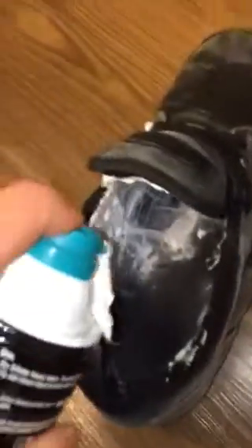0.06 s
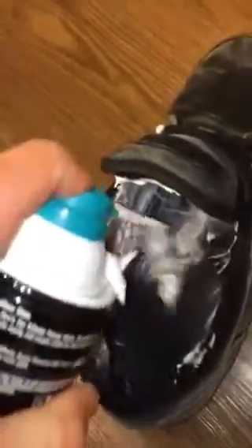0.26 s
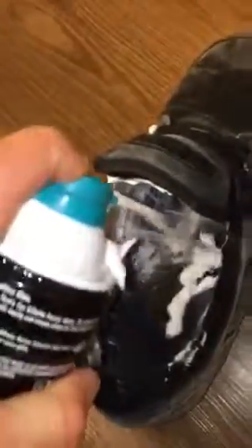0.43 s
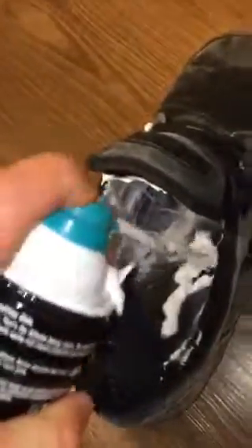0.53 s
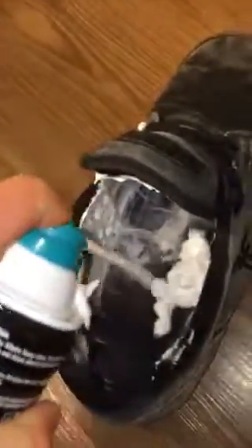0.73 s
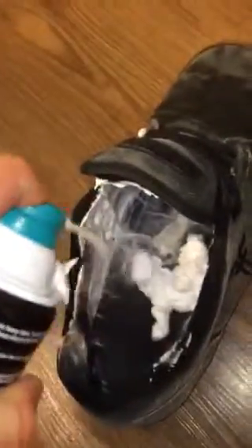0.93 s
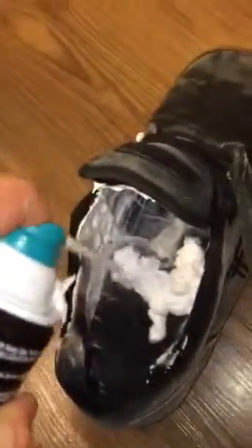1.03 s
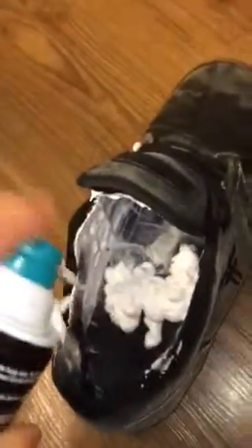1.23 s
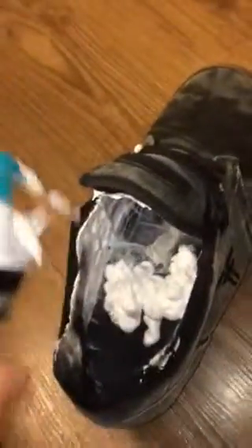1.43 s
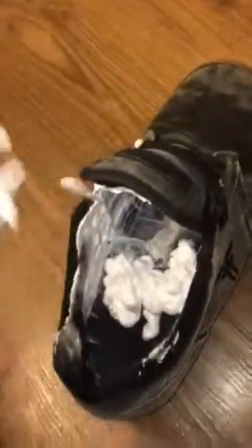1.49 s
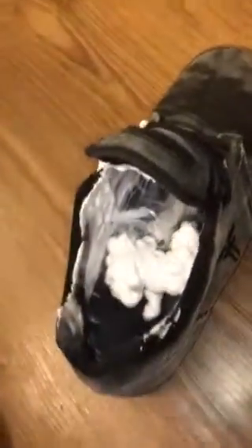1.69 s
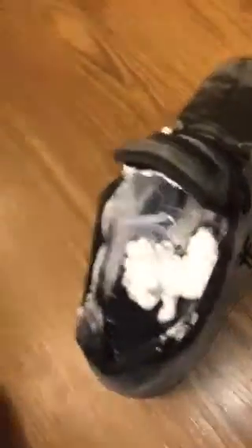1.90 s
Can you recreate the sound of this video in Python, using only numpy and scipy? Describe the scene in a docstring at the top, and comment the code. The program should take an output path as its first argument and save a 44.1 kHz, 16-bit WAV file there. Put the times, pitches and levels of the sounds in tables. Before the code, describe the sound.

An aerosol can sprays foam close to the microphone. From about 0.2 seconds the nozzle spits quick wet bursts, loudest near 0.3, then settles into a sputtering hiss with tiny pops that slowly swells. A thin, airy whistle joins around 1.1 seconds, and the spray cuts off at 1.3 with a brief fizz. One faint tick follows at 1.7. An appliance hums low in the quiet room throughout.

```python
"""Foam spray on a shoe

Close to the microphone, in a quiet room with an appliance humming, an aerosol can sprays foam.
The nozzle spits a quick run of wet bursts, then settles into a sputtering jet that slowly swells.
Gas pockets pop in the stream, and the nozzle sings just before the valve shuts.
The foam fizzes for a moment, the room rings briefly, and one faint tick follows."""
import sys
import numpy as np
from scipy import signal
from scipy.fft import rfft, irfft
from scipy.io import wavfile

SR = 44100
rng = np.random.default_rng(int(sys.argv[2]) if len(sys.argv) > 2 else 0)


def wav_out(sig):
    """Save sig, one row per channel (or a flat mono array), as 16-bit PCM at SR to the path in sys.argv[1]."""
    wavfile.write(sys.argv[1], SR, np.round(np.clip(np.atleast_2d(sig).T, -1, 1) * 32767).astype(np.int16))


N = 85995
T = np.arange(N) / SR

# appliance hum (frequency [Hz], level [dB])
HUM_TONES = [(74, -60), (102.3, -60.5), (121, -59.5), (150.7, -60.5), (183, -56), (296, -72), (393, -70.5),
             (468, -71.5), (899, -78), (952.8, -76.5)]
# rumble of the room (frequency [Hz], relative level [dB])
RUMBLE_COLOUR = [(20, -26), (45, -14), (70, -1), (125, -2.5), (190, -6.5), (230, -9.5), (330, -16.5),
                 (560, -16.5), (720, -25.5), (950, -28), (1200, -27), (2000, -32.5), (2700, -35.5),
                 (5000, -43.5), (9000, -47.5), (15500, -52)]
# the room's reverberation (frequency [Hz], time to fall 60 dB [s])
REVERB_TIMES = [(300, 0.02), (1300, 0.43), (3000, .34), (4400, .38), (6500, 0.34), (12000, 0.2)]
# its diffuse tail (frequency [Hz], gain [dB])
REVERB_COLOUR = [(300, -18.5), (1500, -10), (3000, -13.5), (4500, -9), (7000, -15.5), (14000, -13)]
# spectra of the tick, settling foam, gas hiss and spits (frequency [Hz], relative level [dB])
TICK_COLOUR = [(200, -4), (700, -2), (1300, -5), (2200, -1), (4000, -14), (8000, -21), (10000, -27),
               (15000, -26)]
FIZZ_COLOUR = [(500, -19), (1500, -5), (2800, -4.5), (3900, -5), (4700, 2), (5600, -5), (7000, -19),
               (10000, -28), (15000, -34)]
GAS_COLOUR = [(3000, -12), (9000, -5), (10400, 2), (11200, -1), (14700, -2.5), (15600, 0.5)]
SPIT_COLOUR = [(200, -19.5), (580, -27), (850, -2.5), (1250, -8.5), (2000, 3.5), (2450, -4), (2800, 3.5),
               (3500, -9.5), (3950, 0.5), (4800, -10.5), (5350, -6), (5800, -11), (6400, -9), (7500, -18),
               (10000, -22.5), (11800, -18.5), (13000, -28.5), (15500, -30)]
# flow through the nozzle (time [s], level [dB])
FLOW_LEVELS = [(.162, -50), (.168, -49.5), (.2, -44), (.24, -34), (.26, -33.5), (.288, -30), (.305, -38),
               (.335, -42.5), (.42, -41), (.6, -39), (.85, -35), (1.0, -36), (1.06, -34.5), (1.2, -34.5),
               (1.275, -35.5), (1.289, -40.5), (1.296, -79)]
# resonances of the singing nozzle (frequency [Hz], width [Hz], level at the peak [dB])
NOZZLE_MODES = [(3620, 200, -40), (4474, 180, -38.5), (5360, 350, -44)]
# narrow dips in the spray's spectrum (frequency [Hz], width [Hz])
SPRAY_NOTCHES = [(4920, 306), (10400, 680)]
# large gas pockets popping (time [s], relative level [dB], pitch [Hz])
LARGE_POPS = [(.1932, -28, 8070), (0.2027, -27, 5300), (.2155, -24.5, 6500), (0.2636, -18.5, 2840),
              (.2788, -19, 5260), (.4307, -32.5, 6500), (.4477, -32, 5370), (.458, -21.5, 4180),
              (0.457, -29, 6550), (0.495, -29, 4130), (0.4952, -32.5, 6720), (.5534, -29, 6800),
              (.5543, -34.5, 8300), (0.598, -30, 4070), (.603, -26.5, 4250), (.6115, -30, 5400),
              (.6316, -27, 3400), (.7122, -28, 5510), (.7202, -30.5, 7700), (0.727, -25.5, 4270),
              (.7406, -28.5, 4000), (0.7517, -28.5, 6460), (.824, -26, 6500), (.8509, -23.5, 5860),
              (0.8561, -20, 3600), (.8799, -30, 7700), (0.9148, -27, 6240), (.9227, -23, 6500),
              (.9227, -28, 9070), (0.9366, -25, 3500), (0.985, -25, 4700), (.9993, -29, 8000),
              (1.0922, -29.5, 7580), (1.12, -25, 4280), (1.1348, -22, 5600), (1.1586, -30, 5460),
              (1.196, -25.5, 3500), (1.2286, -35, 8440), (1.2618, -24, 3620), (1.2718, -21.5, 3700)]
# spits as the nozzle clears (time [s], relative level [dB], treble against the whole [dB])
SPIT_EVENTS = [(0.172, -34.5, -16), (0.1741, -36, -21), (0.1879, -33, -9.0), (0.1978, -30, -16),
               (0.2, -27.5, -17), (0.209, -24, -8.5), (0.2144, -29, 2), (0.2225, -25.5, -2.5),
               (0.2308, -25, -7), (0.2403, -22.5, -9), (0.25, -24, -16), (0.2532, -18.5, -18),
               (0.2587, -23, -16), (0.2634, -17.5, -24.0), (0.2685, -34, -15), (0.2749, -21.0, -12.5),
               (0.2779, -25.5, -15), (0.2861, -16.5, -19), (0.288, -20, -18), (0.2934, -20.5, -7),
               (0.3041, -30.5, 3), (0.3251, -28.5, -25)]
# jet spectrum, early then late (frequency [Hz], relative level [dB], frequency [Hz], relative level [dB])
JET_COLOURS = [(100, -22, 100, -21), (420, -11, 410, -11), (544, -14, 570, -17), (690, -2, 720, -6),
               (900, 1, 1000, 2), (1300, 0, 1380, 2.5), (1655, -2.5, 1680, -1.5), (2030, 3, 2180, 4),
               (2380, -4.5, 2580, -9), (2720, 2, 3090, -0.5), (3160, -3, 3330, -5), (3480, -8, 3620, 0.5),
               (3750, -3.5, 4050, -8), (4120, -1, 4460, -1.5), (4920, -7, 5100, -7),
               (5360, -3.5, 5500, -3.5), (6000, -13.5, 6050, -13), (6700, -10, 6900, -11.5),
               (7400, -19.5, 7100, -14.5), (8400, -18.5, 8700, -15.5), (10100, -27, 10400, -22),
               (15600, -28, 14000, -30)]


def amp(db):
    """Decibels to gain."""
    return 10 ** (np.asarray(db) / 20)


def unit(x):
    """Scales to rms 1."""
    return x / np.sqrt(np.mean(abs(x) ** 2) + 1e-20)


def read(points, hz):
    """Reads a curve on a log-frequency axis."""
    f, value = np.transpose(points)
    return np.interp(np.log(hz + 1), np.log(f + 1), value)


def add(mix, start_s, sound):
    """Mixes a sound in at a time."""
    part = mix[round(start_s * SR):][:len(sound)]
    part += sound[:len(part)]


def colour(x, points, size=8192):
    """Applies a causal filter of unit energy with the given spectrum."""
    log_gain = np.log(amp(read(points, abs(np.fft.fftfreq(size, 1 / SR)))))
    taps = np.fft.ifft(np.exp(np.conj(signal.hilbert(log_gain)))).real[:size // 2]
    return signal.fftconvolve(x, taps / np.linalg.norm(taps))[:N]


def resonate(x, hz, width_hz):
    """Passes a sound through one resonance."""
    return signal.lfilter(*signal.iirpeak(hz, hz / width_hz, fs=SR), x)


def drift(rate_hz):
    """Random wandering of rms 1, mostly slower than the rate."""
    hz = np.fft.rfftfreq(N, 1 / SR)
    return unit(irfft(rfft(rng.standard_normal(N)) * np.exp(-(hz / rate_hz) ** 2), N))


def room_tone(waver=0.72, waver_hz=8.3, rumble_db=-52.5):
    """An appliance hums unsteadily over a low rumble."""
    hum = np.zeros(N)
    for hz, db in HUM_TONES:
        wander = 1 + waver * (drift(waver_hz) + 1j * drift(waver_hz))
        tone = np.exp(2j * np.pi * (hz * T + rng.random()))
        hum += amp(db) * unit((wander * tone).real)
    gain = amp(read(RUMBLE_COLOUR, np.fft.rfftfreq(N, 1 / SR)))
    rumble = irfft(rfft(rng.standard_normal(N)) * gain, N)
    return hum + amp(rumble_db) * unit(rumble)


def room(x, reflections=8, near_db=-11, near_s=.004):
    """The microphone hears the direct sound, reflections off shoe and floor, and a short diffuse tail."""
    hz, t, noise = signal.stft(rng.standard_normal(SR // 2), SR, nperseg=256)
    t60 = read(REVERB_TIMES, hz)[:, None]
    decay = amp(read(REVERB_COLOUR, hz)[:, None] - 60 * t / t60)
    energy_norm = np.sqrt(2 * np.log(1000) / (t60 * SR))
    tail = signal.istft(noise * decay * energy_norm, SR, nperseg=256)[1]
    response = np.r_[np.zeros(round(near_s * SR)), tail]
    for place, sign in zip(rng.random(reflections), rng.choice([-1, 1], reflections)):
        response[round(near_s * (.5 + 2 * place) * SR)] += sign * amp(near_db) / np.sqrt(reflections)
    return x + signal.fftconvolve(x, response)[:N]


def tick(start_s=1.7114, db=-53, decay_s=.0015):
    """One faint tick after the spray."""
    out, t = np.zeros(N), np.arange(SR // 40) / SR
    add(out, start_s, amp(db) * np.exp(-t / decay_s) * rng.standard_normal(len(t)))
    return colour(out, TICK_COLOUR)


def fizz(valve_shut_s=1.29, db=-47.5, decay_s=0.041, flutter_db=3.3):
    """Fresh foam crackles and settles once the stream stops."""
    age = T - valve_shut_s
    fade = (age > 0) * np.exp(-abs(age) / decay_s)
    cells = unit(rng.standard_normal(N) * amp(flutter_db * drift(rate_hz=320)))
    return colour(amp(db) * fade * cells, FIZZ_COLOUR)


def flow():
    """Strength of the stream over time, zero while the valve is shut."""
    return amp(np.interp(T, *np.transpose(FLOW_LEVELS), left=-np.inf, right=-np.inf))


def gas_hiss(open_s=0.14, ramp_s=.025, release_s=.005):
    """Escaping gas hisses finely; it builds as the valve opens and trails off when it shuts."""
    pole = np.exp(-1 / (release_s * SR))
    pressure = signal.lfilter([1 - pole], [1, -pole], flow() ** 0.31)  # follows the flow only weakly
    opening = np.clip((T - open_s) / ramp_s, 0, 1)
    return colour(amp(-45) * opening * pressure * rng.standard_normal(N), GAS_COLOUR)


def nozzle_song(start_s=1.09, peak_s=1.275, rise_db=8.5, fade_s=0.0075, flutter_db=4.5):
    """Gas excites the nozzle's resonances, more strongly as the pressure rises, until the valve shuts."""
    rise = amp(rise_db * np.minimum((T - peak_s) / (peak_s - start_s), 0))
    fade_in = np.clip((T - start_s) / fade_s, 0, 1)
    fade_out = np.exp(-np.maximum(T - peak_s, 0) / fade_s)
    tones = np.zeros(N)
    for hz, width_hz, db in NOZZLE_MODES:
        gas = rng.standard_normal(N) * amp(flutter_db * drift(rate_hz=74))
        tones += amp(db) * unit(resonate(gas, hz, width_hz))
    return rise * fade_in * fade_out * tones


def pop(hz, rise_cycles, glide=.02, puff_db=-5.5, puff_octaves=0.44):
    """A gas pocket opens with a puff and rings for a few cycles, rising slightly in pitch."""
    t = np.arange(SR // 80) / SR
    age = t * hz / rise_cycles
    pitch_hz = hz * (1 + glide * np.tanh(age - 1))
    ring = np.sin(2 * np.pi * (np.cumsum(pitch_hz) / SR + rng.random()))
    band = signal.butter(2, [hz / 2 ** puff_octaves, hz * 2 ** puff_octaves], "band", fs=SR)
    puff = unit(signal.lfilter(*band, rng.standard_normal(len(t))))
    return (age * np.exp(1 - age)) ** 2 * (ring + amp(puff_db) * puff)


def pops(large_rise_s=0.0006, small_per_s=150, small_hz=5710, small_octaves=0.596, muffle_hz=10900):
    """Large gas pockets pop among small ones that follow the flow; the foam muffles their treble."""
    out, strength = np.zeros(N), flow()
    for start_s, db, hz in LARGE_POPS:
        add(out, start_s, amp(db - 0.5) * pop(hz, rise_cycles=hz * large_rise_s))
    bursts = (rng.random(N) < small_per_s / SR) & (strength > 0)
    sizes = amp(-7 + 4.5 * np.minimum(rng.exponential(1, N), 2))
    pitch_hz = small_hz * 2 ** (small_octaves * rng.uniform(-1.01, 1, N))
    for i in np.flatnonzero(bursts):
        add(out, i / SR, strength[i] * sizes[i] * pop(pitch_hz[i], rise_cycles=2.9))
    return signal.lfilter(*signal.butter(2, muffle_hz, fs=SR), out)


def spits(rise_s=0.00092, usual_treble_db=-13.5, crossover_hz=6000):
    """Slugs of liquid leave the nozzle, each followed by a short blast of gas."""
    body, treble, t = np.zeros(N), np.zeros(N), np.arange(SR // 50) / SR
    envelope = t / rise_s * np.exp(1 - t / rise_s)
    envelope_rms = np.sqrt(np.mean(envelope ** 2))
    for start_s, db, treble_db in SPIT_EVENTS:
        blast = amp(db - 3) * envelope_rms * unit(envelope * rng.standard_normal(len(t)))
        add(body, start_s, blast)
        add(treble, start_s, blast * amp(treble_db - usual_treble_db))
    lowpass = signal.butter(2, crossover_hz, fs=SR)
    blasts = treble + signal.filtfilt(*lowpass, body - treble)  # body below the crossover, treble above
    return colour(blasts, SPIT_COLOUR)


def jet(cells_per_s=3500, spread_db=3.5, hiss_db=-2.5, flutter_db=1.55, slide_s=(0.39, 1.15), steps=7):
    """Tiny foam cells burst at the nozzle over a fluttering hiss; the resonances slide upward."""
    sizes = amp(spread_db * np.minimum(rng.exponential(1, N), 4))
    crackle = sizes * rng.choice([-1, 1], N) * (rng.random(N) < cells_per_s / SR)
    sputter = unit(unit(crackle) + amp(hiss_db) * rng.standard_normal(N))
    stream = flow() * unit(sputter * amp(flutter_db * drift(rate_hz=370)))
    slide = np.interp(T, slide_s, [0, 1])
    early, late = np.hsplit(np.array(JET_COLOURS), 2)
    out = np.zeros(N)
    for stage in np.linspace(0, 1, steps):
        crossfade = np.maximum(1 - abs(slide - stage) * (steps - 1), 0)
        out += colour(stream * crossfade, early + stage * (late - early))
    return out


def notched(x, depth=.65):
    """Cuts narrow dips into everything that comes from the nozzle."""
    for hz, width_hz in SPRAY_NOTCHES:
        x = x - depth * resonate(x, hz, width_hz)
    return x


def scene():
    """The can at close range, with the room tone behind it, in mono."""
    spray = notched(jet() + gas_hiss() + spits() + nozzle_song() + pops())
    return (room_tone() + room(spray + fizz() + tick()))[None]


def record(dry):
    """The recorder cuts off the microphone's signal above 15780 Hz."""
    lowpass = signal.firwin(511, 15780, window=("kaiser", 9), fs=SR)
    return signal.oaconvolve(dry, lowpass[None], "same")


dry = scene()
out = record(dry)
wav_out(out)
```